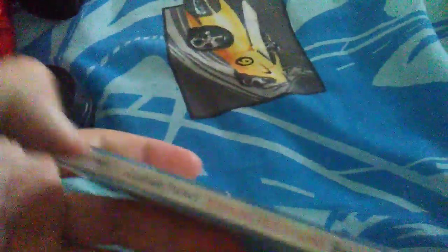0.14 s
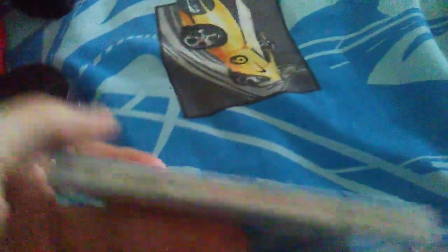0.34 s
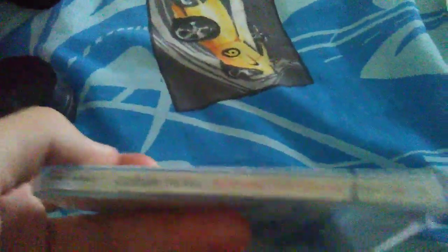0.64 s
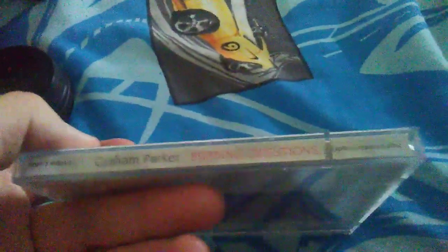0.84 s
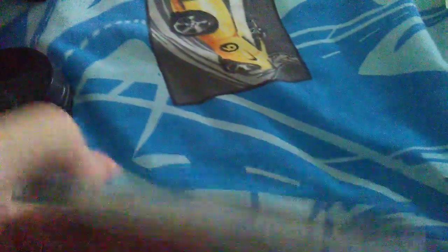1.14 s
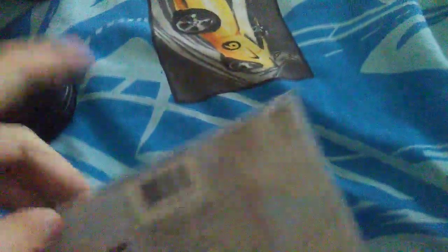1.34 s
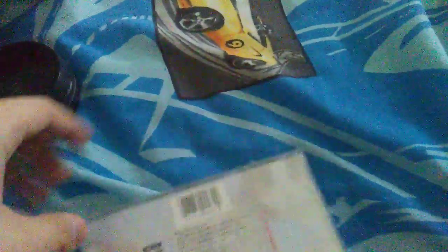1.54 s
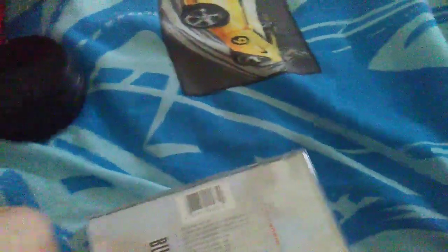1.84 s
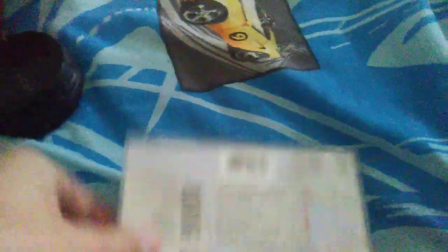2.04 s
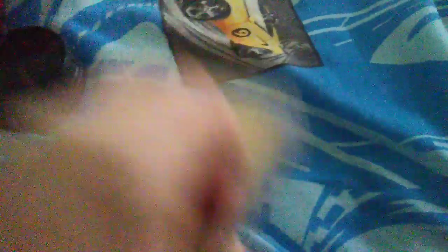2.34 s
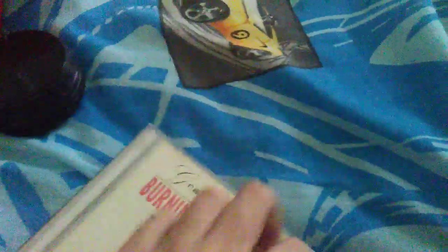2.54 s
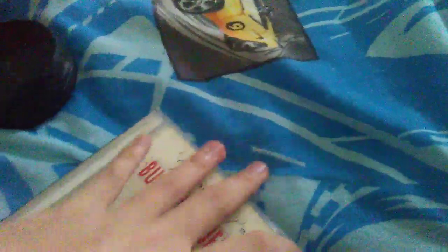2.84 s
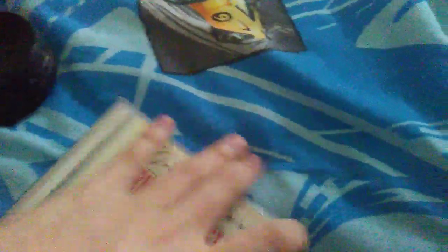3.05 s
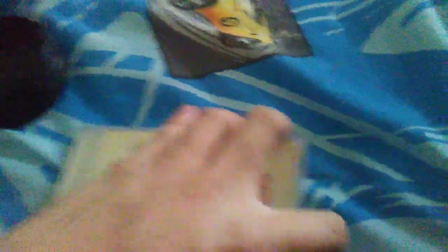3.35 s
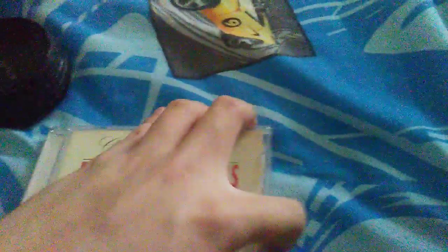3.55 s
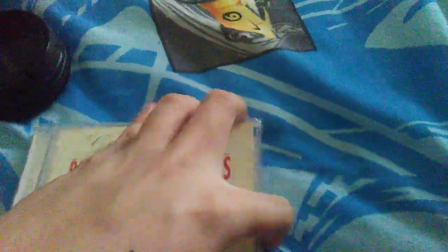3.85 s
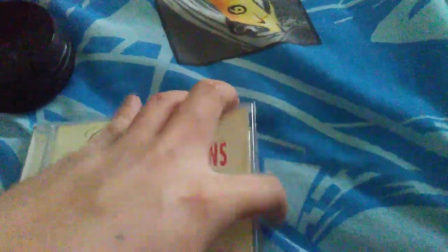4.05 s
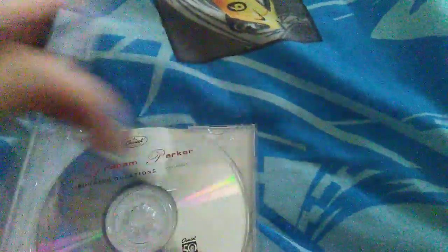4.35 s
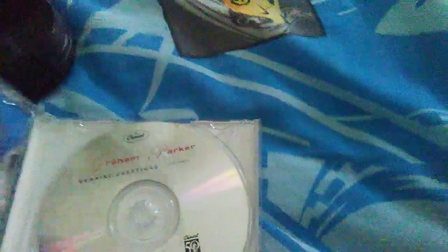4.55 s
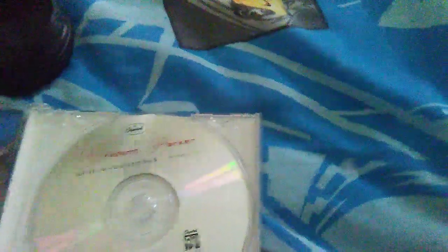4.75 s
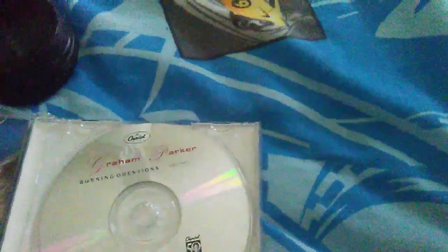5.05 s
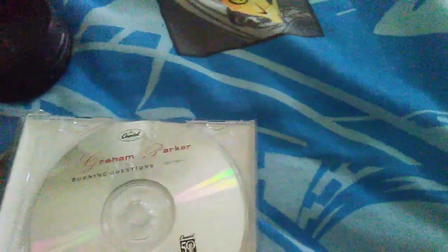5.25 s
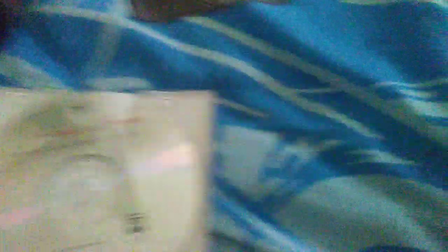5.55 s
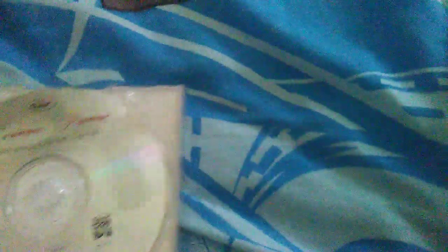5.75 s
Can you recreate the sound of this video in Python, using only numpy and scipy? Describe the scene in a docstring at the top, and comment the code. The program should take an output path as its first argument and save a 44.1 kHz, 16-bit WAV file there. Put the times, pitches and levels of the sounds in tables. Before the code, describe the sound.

In a quiet, dead room, close to a small mono microphone, a hand handles a plastic disc case over a bed sheet. Light taps and faint scrapes come first, then a small drop with rapid bounces and a denser cluster of knocks. After a calmer pause, the latches give one sharp, loud snap. The lid swings with a rubbing hinge and thin squeaks, and rustling and light clicks continue.

```python
"""A quiet, dead room: a plastic disc case is handled on a bed sheet, close to a small mono microphone.
Behind it lie a low room noise and the rub and hiss of hand and case over the cloth, made of filtered noise.
Nearer, the hinge rubs and squeaks as moving resonances of noise, and the open tray sings along as it slides.
Nearest are knocks, scrapes and a drop with bounces, made of short bursts that ring the shell,
and one sharp snap, a volley of hard slips, as the latches let the lid go."""
import sys
import numpy as np
from scipy import signal
from scipy.io import wavfile
from scipy.ndimage import uniform_filter1d

SR = 44100
rng = np.random.default_rng(int(sys.argv[2]) if len(sys.argv) > 2 else 0)


def transcribe(signal):
    """Save signal, clipped to [-1, 1], as a 16-bit WAV file at the path in sys.argv[1]."""
    frames = np.atleast_2d(signal).T
    limited = np.clip(frames, -1, 1)
    pcm = np.round(limited * 32767).astype(np.int16)
    wavfile.write(sys.argv[1], SR, pcm)


N = 259584


def gain_of(db):
    """Decibels to amplitude."""
    return 10 ** (np.asarray(db) / 20)


def evened(x):
    """Scales to rms 1."""
    return x / np.sqrt(np.mean(x ** 2) + 1e-20)


def as_blow(x):
    """Scales a short sound to the energy of 10 ms at rms 1."""
    return x * np.sqrt(SR / 100 / (np.sum(x ** 2) + 1e-20))


def read(points, hz):
    """A spectrum's dB at the given frequencies, interpolated over log frequency."""
    f, db = np.transpose(points)
    return np.interp(np.log(hz + 1), np.log(f + 1), db)


def follow(curve):
    """A control curve at every sample."""
    return np.interp(np.arange(N) / SR, *np.transpose(curve))


def add(mix, s, sound):
    """Mixes a sound in at s seconds."""
    part = mix[round(s * SR):][:len(sound)]
    part += sound[:len(part)]


def colour(x, spectrum, size=2048):
    """Causal, minimum-phase filter with the given spectrum."""
    log_gain = np.log(gain_of(read(spectrum, abs(np.fft.fftfreq(size, 1 / SR)))))
    response = np.exp(np.conj(signal.hilbert(log_gain)))
    taps = np.fft.ifft(response).real
    return signal.oaconvolve(x, taps)[:len(x)]


def resonate(x, hz, width):
    """One resonance of gain 1, fixed or moving: shift hz down to zero, smooth, shift back."""
    turn = np.exp(2j * np.pi * np.cumsum(hz * np.ones(len(x))) / SR)
    r = np.exp(-np.pi * width / SR)
    smoothed = signal.lfilter([1 - r], [1, -r], x / turn)
    return 2 * (turn * smoothed).real


def wander(per_s, count=N):
    """Random curve of rms 1 that heads for a new value per_s times a second."""
    at = np.arange(count) * per_s / SR
    return evened(np.interp(at, np.arange(count), rng.standard_normal(count)))


def friction(grain_db, grains_per_s, count=N):
    """Noise that comes in small clumps as surfaces catch and slip."""
    return evened(rng.standard_normal(count) * gain_of(grain_db * wander(grains_per_s, count)))


def contact(rattle_s, rattle_db, tail_db, tail_s, rise_s, size=6000):
    """Surfaces meet over a moment, hit home, rattle, and echo faintly inside the case."""
    t = np.arange(size) / SR
    meeting = np.minimum(t / rise_s, 1) ** 2
    impact = signal.unit_impulse(size, np.argmax(meeting))
    rattle = friction(grain_db=2.5, grains_per_s=1346, count=size) * meeting * np.exp(-t / rattle_s)
    tail = rng.standard_normal(size) * meeting * np.exp(-t / tail_s)
    return as_blow(impact) + gain_of(rattle_db) * as_blow(rattle) + gain_of(tail_db) * as_blow(tail)


# noise floor of the room, mostly low: f/Hz, spectral level/dB per Hz
ROOM_SPECTRUM = [(25, -28), (62, 3), (125, -18), (260, -2.5), (600, -3), (3600, -13), (6000, -23)]


def room_quiet(quiet_db):
    """The quiet room behind everything: steady noise, strongest in the bass."""
    return gain_of(quiet_db) * evened(colour(rng.standard_normal(N), ROOM_SPECTRUM))


# strokes of hand and case over the sheet: start t/s, end t/s, level/dB before swell and wobble,
# brightness/dB per octave
STROKES = [(0.077, 0.105, -67, 4), (0.303, 0.327, -65, 2), (0.449, 0.503, -69, 1), (1.123, 1.181, -54.5, 1),
           (1.222, 1.352, -52.5, 0), (1.418, 1.427, -56, 1.5), (1.48, 1.558, -60, -1),
           (1.949, 2.068, -58, -0.5), (2.128, 2.242, -50, -0.5), (2.449, 2.527, -47, -2),
           (2.546, 2.7, -58.5, 1.5), (2.73, 2.948, -53.5, 2), (3.059, 3.183, -63.5, 1),
           (4.05, 4.292, -56, 1.1), (4.3, 4.72, -52.5, 1.6), (4.82, 4.985, -56, -0.5),
           (5.043, 5.125, -54.5, 0), (5.15, 5.182, -55.5, 0.5), (5.234, 5.59, -63.5, -0.5),
           (5.809, 5.89, -58, 2.5)]
ATTACK_S, RELEASE_S, SWELL_DB = 0.054, 0.023, 1  # rise before the start, fade after the end, growth between
OPENED_S = 4.02  # the lid is free
HOLD_DB, HOLD_OPEN_DB = -80.5, -65.5  # between strokes the hand still creeps, more so on the loose, open case


def sliding():
    """Level (dB) and brightness (dB per octave) of the rubbing: strokes over the creep of the holding hand."""
    t = np.arange(N) / SR
    power = gain_of(np.where(t < OPENED_S, HOLD_DB, HOLD_OPEN_DB)) ** 2
    tilt = np.zeros(N)
    for start, end, db, bright in STROKES:
        attack = np.clip((t - start) / ATTACK_S + 1, 0, 1) ** 2
        swell_db = SWELL_DB * (np.clip((t - start) / (end - start), 0, 1) - .5)
        release = np.exp(-np.maximum(t - end, 0) / RELEASE_S)
        stroke = (attack * gain_of(db + swell_db) * release) ** 2
        power = power + stroke
        tilt = tilt + bright * stroke
    return 10 * np.log10(power), tilt / power  # the louder motion sets the brightness


# dull rub of the bedding: f/Hz, spectral level/dB per Hz
BEDDING_SPECTRUM = [(25, -24.5), (65, -6.5), (125, -20.5), (190, -3.5), (290, 3.5), (500, -5), (3000, -55)]


def bedding(slide_db, rub_db=-34, growth=0.57):
    """The soft, low rub of the bed grows more slowly than the hiss."""
    rub = evened(colour(friction(grain_db=2.0, grains_per_s=120), BEDDING_SPECTRUM))
    return gain_of(rub_db + growth * slide_db) * rub


# hiss of the weave, also the echo of the snap: f/Hz, spectral level/dB per Hz
WEAVE_SPECTRUM = [(150, -16), (500, -6), (1100, -1.5), (1600, -6), (2200, 0), (3300, -1.5), (6200, -6.5),
                  (8400, -4.5), (9800, -12), (16000, -14.5)]


def swish(slide_db, bright, hiss_db=1, patchy_db=1.0, pivot_hz=3000):
    """Fine hiss of the weave, tilted by the touch, with drifting patches of colour."""
    hiss = evened(colour(friction(grain_db=1.5, grains_per_s=900), WEAVE_SPECTRUM))
    hz, t, z = signal.stft(hiss, SR, nperseg=512)
    octaves = np.log2(np.maximum(hz, pivot_hz / 2) / pivot_hz)[:, None]
    across_hz = uniform_filter1d(rng.standard_normal(z.shape), size=7, axis=0)
    patches = evened(uniform_filter1d(across_hz, size=9, axis=1))
    tilt_db = octaves * np.interp(t, np.arange(N) / SR, bright)
    z = z * gain_of(tilt_db + patchy_db * patches)
    return signal.istft(z, SR)[1][:N] * gain_of(slide_db + hiss_db)


# resonances of the open tray as it slides: centre f/Hz, width f/Hz, relative level/dB
TRAY_MODES = [(366, 93, 4), (2000, 190, 3.5), (3430, 120, 5.5), (7270, 880, 2.5)]


def tray(slide_db, lid_up_s=4.04, tray_db=-34, growth=0.42, drift=0.037):
    """Once the lid is up, the bare tray sings along with the sliding; its resonances drift as the grip shifts."""
    drive = friction(grain_db=3.5, grains_per_s=180)
    modes = np.zeros(N)
    for hz, width, db in TRAY_MODES:
        centre = hz * (1 + drift * wander(7.4))
        modes += gain_of(db) * evened(resonate(drive, centre, width))
    opened = follow([(lid_up_s - .03, 0), (lid_up_s + 0.02, 1)])
    return opened * gain_of(tray_db + growth * slide_db) * evened(modes)


def finger_ticks(slide_db, per_s=110, tick_db=-29, growth=0.65, spread_db=5.0):
    """Skin and threads catch on the case in tiny ticks, stronger as the hand moves."""
    strength = gain_of(spread_db * np.minimum(rng.exponential(1, N), 3))
    catches = strength * (rng.random(N) < per_s / SR)
    catch = contact(rattle_s=0.0008, rattle_db=3, tail_db=-24, tail_s=0.01, rise_s=0.00065)
    train = signal.oaconvolve(catches, catch)[:N]
    ticks = evened(colour(train, CLACK_SPECTRUM)) + 0.24 * evened(colour(train, TICK_SPECTRUM))
    return gain_of(tick_db + growth * slide_db) * evened(ticks)


# the lid rubs as it swings up and over: t/s, level of the lower band/dB, its resonance f/Hz
HINGE_PATH = [(4.0, -82, 3400), (4.06, -60, 3550), (4.3, -54.5, 3400), (4.55, -53, 2700),
              (4.625, -59, 2900), (4.665, -50, 3600), (4.73, -56, 2900), (4.76, -76, 3000)]


def hinge(width_hz=1300, overtone_hz=7100, overtone_db=-5):
    """A smooth rub whose lower resonance shifts as the lid swings open, under a fixed higher one."""
    s, db, hz = np.transpose(HINGE_PATH)
    t = np.arange(N) / SR
    rub, centre = friction(grain_db=2.0, grains_per_s=210), np.interp(t, s, hz)
    low = resonate(resonate(rub, centre, width_hz), centre, width_hz)
    high = resonate(resonate(rub, overtone_hz, 2 * width_hz), overtone_hz, 2 * width_hz)
    swing = gain_of(np.interp(t, s, db)) * (t > s[0]) * (t < s[-1])
    return swing * (evened(low) + gain_of(overtone_db) * evened(high))


# squeaks of the hinge: start t/s, end t/s, level of the fundamental/dB, mean pitch f/Hz,
# glide/share of the pitch per s
SQUEAKS = [(4.03, 4.085, -55, 3500, 3), (4.08, 4.22, -56, 3590, .6), (4.555, 4.615, -47, 2650, .2),
           (4.575, 4.615, -48, 3470, .2), (4.675, 4.735, -54, 2000, -.3)]


def squeaks(width_hz=130, waver=.003, overtone_db=-17, count=4):
    """The hinge pins stick and slip: thin, wavering, gliding whistles with overtones."""
    out = np.zeros(N)
    for start, end, db, hz, glide in SQUEAKS:
        t = np.arange(0, end - start, 1 / SR)
        pitch = hz * (1 + glide * (t - t.mean()) + waver * wander(40, len(t)))
        for k in range(1, count + 1):
            noise = rng.standard_normal(len(t))
            tone = resonate(resonate(noise, k * pitch, width_hz), k * pitch, width_hz)
            level = gain_of(db + overtone_db * (k > 1))
            add(out, start, level * evened(tone * np.hanning(len(t)) ** .5))
    return out


# ringing modes of the shell: f/Hz, relative level/dB
SHELL_MODES = [(269, 3.5), (468, 0.5), (900, 0.5), (1300, 2), (1565, 2.5), (1725, -4), (1835, -4),
               (2270, 2.5), (2570, 1.5), (2790, -5), (3212, -0.5), (3480, -5.5), (3753, 3), (5480, -4.5)]


def shell_ring(x, t60):
    """The modes of the shell ring on briefly after whatever strikes it, 60 dB down after t60 seconds."""
    t = np.arange(SR // 4) / SR
    ring = sum(gain_of(db) * np.sin(2 * np.pi * (hz * t + rng.random())) for hz, db in SHELL_MODES)
    ring = ring * np.exp(-np.log(1000) * t / t60)
    return signal.oaconvolve(x, ring / np.linalg.norm(ring))[:N]


# plastic or nail dragged over plastic: start t/s, end t/s, level before thud and tick/dB, pitch f/Hz
SCRAPES = [(0.066, 0.116, -51.5, 1770), (0.285, 0.333, -55.5, 2090), (1.308, 1.363, -45.5, 1590),
           (2.219, 2.239, -45, 1800), (2.421, 2.441, -40, 2430), (2.486, 2.514, -39.5, 1300),
           (3.55, 3.603, -47.5, 1800), (4.565, 4.61, -54.5, 2914)]


def scrapes(ring_width_hz=900, thud_db=-12, tick_db=-19):
    """Short, finely crackling stick-slip on the shell."""
    out = np.zeros(N)
    for start, end, db, hz in SCRAPES:
        count = round((end - start) * SR)
        slips = friction(grain_db=5, grains_per_s=700, count=count)
        body = colour(slips, CLACK_SPECTRUM)
        sound = evened(evened(body) + evened(resonate(body, hz, ring_width_hz)))
        sound += gain_of(thud_db) * evened(colour(slips, THUD_SPECTRUM))
        sound += gain_of(tick_db) * evened(colour(slips, TICK_SPECTRUM))
        add(out, start, gain_of(db) * sound * signal.windows.tukey(count, .4))
    return out


def crackle_swells(swell_db=-28, growth=0.61):
    """A soft swell of crackling noise, 32 ms long, surrounds each listed tap."""
    out, count = np.zeros(N), round(.032 * SR)
    for s, db, *_ in CLICKS:
        crackle = friction(grain_db=5, grains_per_s=500, count=count)
        swell = colour(crackle, CLACK_SPECTRUM) * np.hanning(count)
        add(out, s - count / SR / 2, gain_of(swell_db + growth * db) * as_blow(swell))
    return out


# the parts of a knock, used in other layers too, each f/Hz, spectral level/dB per Hz:
# clack of the plastic, dull thud below, hard tick above
CLACK_SPECTRUM = [(200, -38.5), (600, -3.5), (1000, 1), (1500, -3), (2400, 0), (3700, -0.5), (5500, -5.5),
                  (9000, -40.5)]
THUD_SPECTRUM = [(30, -23), (70, -6), (120, -11.5), (185, 2.5), (450, -2), (900, -5), (2500, -57.5)]
TICK_SPECTRUM = [(3500, -44.5), (6000, 0), (8000, 5), (10300, -3.5), (16000, -20.5)]
# the soft middle of a panel rings low and thuds, a stiff edge hardly does; a firm knock rings more than it thuds
THUD_DB, THUD_PITCH_HZ, THUD_DB_PER_OCTAVE, THUD_GROWTH = -14.5, 1240, -2.5, -0.5
LIFTED_S, LIFTED_THUD_DB = 5.5, 10.5  # held up in the air, the open case thuds more


def knock(s, db, hz, tick_db, ring_width_hz=600, ring_db=1.5, ring_growth=0.074, firm_db=-42, softening=.7):
    """A tap rings the struck part of the shell, with a dull thud below and a hard tick above."""
    firmness_db = db - firm_db  # a firm knock is sudden and rings; a light touch creeps in and skitters
    rise_s = np.clip(.003 * gain_of(-softening * firmness_db), .001, .004)
    if tick_db > -7:  # hard edges meet at once
        rise_s = rise_s / 2
    rattle_db = 7.0 - 0.26 * firmness_db if tick_db < 0 else 0  # a bare tick rattles less
    blow = contact(rattle_s=0.003, rattle_db=rattle_db, tail_db=-10.5, tail_s=0.029, rise_s=rise_s)
    clack = colour(blow, CLACK_SPECTRUM)
    ring = resonate(resonate(clack, hz, ring_width_hz), hz, 2 * ring_width_hz)
    body = as_blow(as_blow(clack) + gain_of(ring_db + ring_growth * firmness_db) * as_blow(ring))
    thud_db = THUD_DB + THUD_DB_PER_OCTAVE * np.log2(hz / THUD_PITCH_HZ) + THUD_GROWTH * firmness_db
    if s > LIFTED_S:
        thud_db = thud_db + LIFTED_THUD_DB
    thud = as_blow(colour(blow, THUD_SPECTRUM))
    tick = as_blow(colour(blow, TICK_SPECTRUM))
    return s - rise_s / 2, gain_of(db) * (body + gain_of(thud_db) * thud + gain_of(tick_db) * tick)


# dropped on the bed, the case rattles to rest in even, fading bounces
DROP_S, DROP_DB, DROP_HZ, DROP_TICK_DB = 1.512, -44, 1530, -22
BOUNCE_S, BOUNCE_LOSS_DB = 0.017, 3


def bounces(count=5):
    """The knocks of the dropped case, as rows like those of CLICKS."""
    return [(DROP_S + k * BOUNCE_S, DROP_DB - k * BOUNCE_LOSS_DB, DROP_HZ, DROP_TICK_DB) for k in range(count)]


# fingers and edges knock on the shell: t/s, level of the body/dB, ring pitch f/Hz, tick re that level/dB
CLICKS = [(0.0352, -55.5, 1700, -16), (0.0953, -44.5, 2000, -8.5), (0.287, -52.5, 2190, -24),
          (0.549, -69, 2470, -10), (0.764, -59, 2990, -15), (1.088, -56.5, 1030, -26),
          (1.351, -45.5, 1890, -22), (1.4638, -51.5, 1130, -24), (1.5051, -45.5, 1100, -14),
          (1.865, -59.5, 2640, -6), (1.9858, -37, 1380, -18), (2.0008, -41.5, 1910, -16),
          (2.0627, -44.5, 1500, -27), (2.1392, -46, 1150, -10), (2.1735, -40.5, 2960, -18),
          (2.313, -46.5, 2180, -9.5), (2.425, -42.5, 2020, -7.5), (2.456, -34, 2390, -8),
          (2.4822, -33.5, 1170, -12), (2.5077, -42, 2500, -8), (2.521, -32, 1240, -19),
          (2.5265, -29.5, 1240, -15), (2.6978, -34, 1290, -13), (3.117, -55, 1160, -7.5),
          (3.151, -49.5, 1150, -12), (3.351, -55.5, 3630, -12), (3.5695, -35.5, 1910, -6),
          (3.891, -34, 2200, -16), (4.094, -52, 1390, -18), (4.265, -39.5, 3430, -5),
          (4.819, -37.5, 3050, -10), (4.833, -50, 1920, -12), (5.104, -45, 3120, -7),
          (5.113, -46, 3350, -7), (5.567, -55.5, 1900, 11.5), (5.628, -57.5, 1090, 1),
          (5.656, -49.5, 2440, -7), (5.673, -49.5, 1000, -4.5), (5.714, -38, 955, -7.5),
          (5.836, -36, 3110, -10.5)]


def clicks():
    """Every tap and bounce of the shell, each a struck blow."""
    out = np.zeros(N)
    for row in CLICKS + bounces():
        add(out, *knock(*row))
    return out


# the latches slip over their catches and the lid jumps free: t/s, level before the ringing/dB
SLIPS = [(3.853, -45.5), (3.8599, -34), (3.8624, -20), (3.866, -18.5), (3.8695, -19), (3.873, -17)]
# crack of the latches: f/Hz, spectral level/dB per Hz
SNAP_SPECTRUM = [(40, -38), (260, -15.5), (700, -9), (1400, 0), (2800, 0), (3800, 2.5), (4300, -3),
                 (4900, 15), (5500, 8), (6300, 0.5), (8300, -12), (16000, -25)]


def snap(tail_db=-35, tail_s=0.027, size=8000, gripped_db=-9, gripped_t60=0.026):
    """A burst of short, hard latch slips jolts the tightly gripped shell; a faint echo follows."""
    out, t = np.zeros(N), np.arange(size) / SR
    for s, db in SLIPS:
        blow = contact(rattle_s=.0022, rattle_db=9, tail_db=-8, tail_s=.013, rise_s=.0014)
        add(out, s, gain_of(db) * as_blow(colour(blow, SNAP_SPECTRUM)))
    out = out + gain_of(gripped_db) * shell_ring(out, gripped_t60)
    echo = colour(rng.standard_normal(size), WEAVE_SPECTRUM) * np.exp(-t / tail_s)
    add(out, SLIPS[-1][0], gain_of(tail_db) * as_blow(echo))
    return out


def scene(ring_db=-21, quiet_db=-74, firm_db=-46, unsteady=0.11, uneven_db=1.85):
    """The quiet room, cloth and plastic, the same in both channels."""
    quiet = room_quiet(quiet_db)
    slide_db, bright = sliding()
    slide_db = slide_db + uneven_db * wander(30)  # the hand never moves quite evenly
    slide_db = slide_db + unsteady * (firm_db - slide_db) * wander(130)  # a light touch stutters, a firm one glides
    cloth = bedding(slide_db) + swish(slide_db, bright)
    rustle = cloth + tray(slide_db) + finger_ticks(slide_db) + hinge() + squeaks()
    plastic = scrapes() + crackle_swells() + clicks()
    crack = snap()
    flex = gain_of(-24) * crack  # the snap's share in the longer ringing
    ringing = shell_ring(gain_of(ring_db) * plastic + flex, t60=0.094)
    mono = quiet + rustle + plastic + crack + ringing
    return np.array([mono, mono])


# the overall tone colour, with a deep notch around 4.4 to 5.2 kHz: f/Hz, gain/dB
TONE_COLOUR = [(3920, 0.5), (4430, -20.5), (5150, -20), (6250, -6), (7100, -2.5)]
EDGE_HZ = 15900  # upper band limit


def record(dry, hiss_db=-82):
    """The overall tone colour, a faint hiss, soft overload on the hardest cracks, then the band limit."""
    heard = np.array([colour(channel, TONE_COLOUR) for channel in dry])
    heard = heard + gain_of(hiss_db) * rng.standard_normal(N)
    ceiling = .65
    heard = ceiling * np.tanh(heard / ceiling)
    low_pass = signal.firwin(511, EDGE_HZ, window=("kaiser", 9), fs=SR)
    return signal.oaconvolve(heard, low_pass[None], "same", axes=1)


dry = scene()
out = record(dry)
transcribe(out)
```